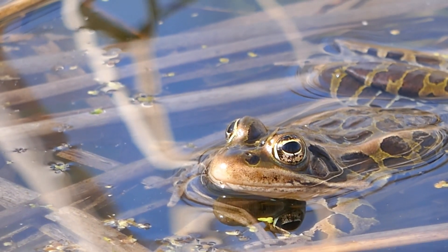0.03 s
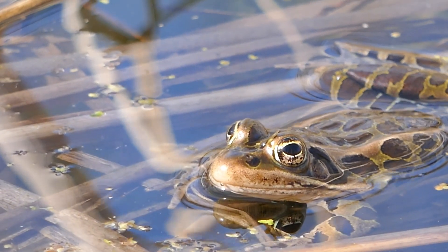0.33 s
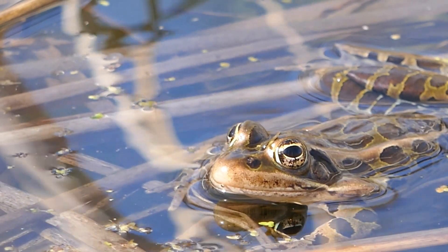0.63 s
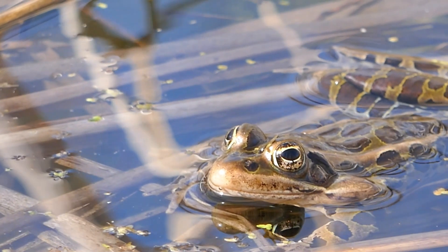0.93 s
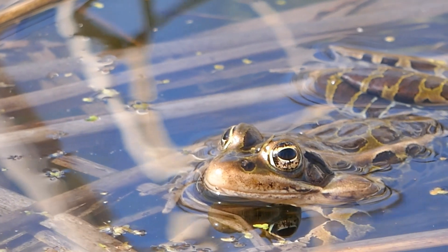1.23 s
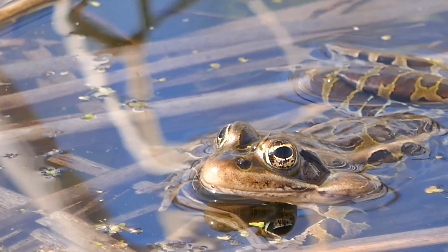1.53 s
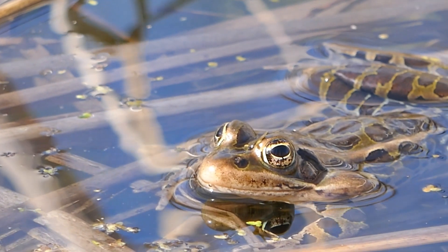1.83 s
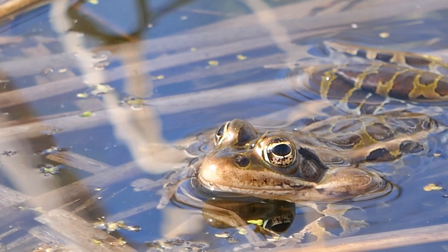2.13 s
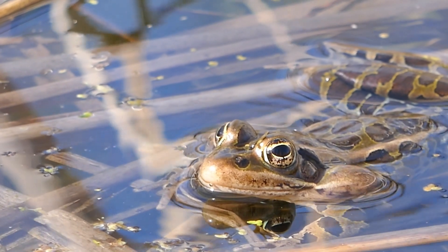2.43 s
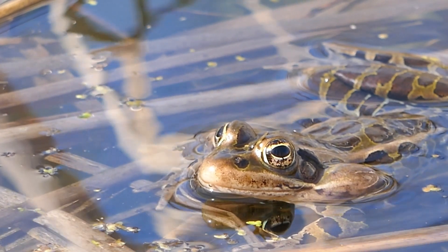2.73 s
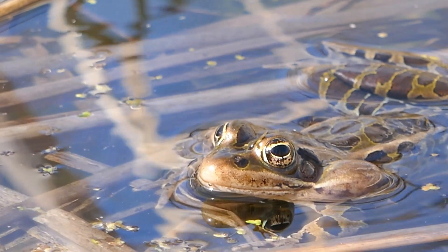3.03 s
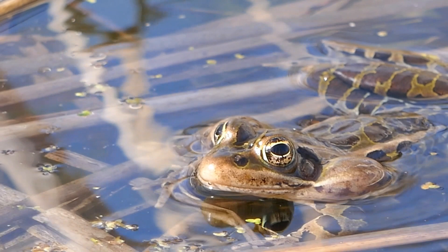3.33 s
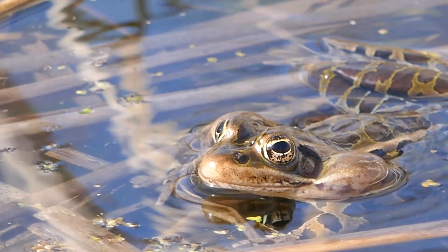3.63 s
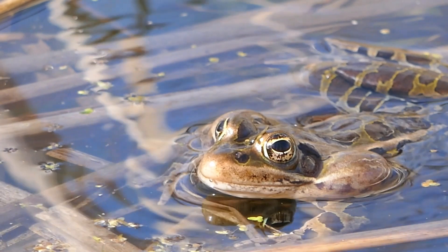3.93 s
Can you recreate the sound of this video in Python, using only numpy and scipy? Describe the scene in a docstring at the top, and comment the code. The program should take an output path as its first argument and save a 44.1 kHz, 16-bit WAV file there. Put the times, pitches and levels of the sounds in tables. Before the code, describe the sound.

One long, rattling snore from a nearby frog swells, then sags in pitch, with a light echo across the pond. Softer frogs tick at the start and toward the end, while distant traffic murmurs throughout.

```python
"""Distant traffic murmurs and a far frog ticks. Then a frog afloat in the pond gives one long snore:
single knocks of its larynx ring its body and swelling vocal sacs, growing louder and slower, then
sagging in pitch. The far frog stops early, as a soft plop sounds; a neighbour ticks along near the end.
Reeds scatter each knock, the banks echo it, and a camera's lens motor whines faintly now and then."""
import sys
import numpy as np
from scipy import signal
from scipy.fft import rfft, irfft
from scipy.io import wavfile
from scipy.ndimage import uniform_filter1d

SR = 44100
rng = np.random.default_rng(int(sys.argv[2]) if len(sys.argv) > 2 else 0)


def bounce(signal):
    """Save signal as a 16-bit WAV file at the path given by the first command-line argument."""
    frames = np.transpose(np.atleast_2d(signal))
    limited = np.clip(frames, -1, 1)
    pcm = np.round(limited * 32767).astype(np.int16)
    wavfile.write(sys.argv[1], SR, pcm)


N = 176400  # 4 seconds


def from_db(db):
    """Turn decibels into a number to multiply a sound by."""
    return 10 ** (np.asarray(db) / 20)


def look_up(table, where):
    """Find a place in a table's first column and read the others, gliding between rows."""
    first, *columns = np.array(table).T
    return [np.interp(where, first, column) for column in columns]


def set_level(sound, db):
    """Scale a sound to an average (rms) level in dB."""
    return sound / np.sqrt(np.mean(sound ** 2)) * from_db(db)


def wander(rate_hz):
    """A smooth random curve that strays about 1 either side of zero."""
    hold = int(SR / rate_hz)
    steps = np.repeat(rng.standard_normal(N // hold + 1), hold)
    return 1.1 * uniform_filter1d(uniform_filter1d(steps, hold), hold)[:N]


def stereo(shared, difference):
    """Add a difference for the left ear and take it away for the right."""
    return np.array([shared + difference, shared - difference])


def add(out, start_s, sound):
    """Mix a stereo sound in at a given time."""
    i = int(start_s * SR)
    out[:, i:i + sound.shape[1]] += sound[:, :max(N - i, 0)]


# The tone of the background. Each row: frequency in Hz, relative level in dB.
MURMUR_TONE = [(20, -78.5), (42, -87.5), (65, -81), (100, -69), (170, -67), (250, -71.5), (380, -72),
               (450, -67.5), (570, -68.5), (720, -75), (900, -75), (1300, -74), (1650, -85), (2300, -89.5),
               (2900, -105), (4400, -107), (5000, -105), (5600, -109.5), (8300, -110), (10500, -105.5),
               (15500, -111.5)]
# Its stereo width. Each row: frequency in Hz, the ears' difference against what they share in dB.
MURMUR_WIDTH = [(30, 0), (70, -20), (170, -12.5), (500, -11), (1300, -10.5), (2300, -6), (5000, -11.5),
                (11000, -6.5), (15000, -14)]

def traffic_and_pond(swell_db=3, flicker_db=0.8):
    """Distant traffic and pond murmur over a thin hiss: low bands swell together and flicker alone."""
    octaves = np.log2(np.fft.rfftfreq(N, 1 / SR) + 1)
    tone_db, = look_up([(np.log2(hz), db) for hz, db in MURMUR_TONE], octaves)
    width_db, = look_up([(np.log2(hz), db) for hz, db in MURMUR_WIDTH], octaves)
    shared, difference = rfft(rng.standard_normal((2, N)))
    spectrum = from_db(tone_db) * stereo(shared, from_db(width_db) * difference)
    swell = swell_db * wander(rate_hz=1.57)
    out = np.zeros((2, N))
    for octave in range(4, 16):
        band = irfft(spectrum * np.maximum(1 - abs(octaves - octave), 0), N)
        if 2 ** octave < 3000:  # the hiss in higher bands stays steady
            band *= from_db(swell + flicker_db * wander(rate_hz=14))
        out += band
    return set_level(out, db=-40.5)


# When the lens motor runs. Each row: start in seconds, end in seconds.
MOTOR_TIMES = [(.475, .668), (1.478, 1.655), (2.972, 3.145), (3.97, 4.0)]
# The tones of its whine. Each row: frequency in Hz, level in dB.
MOTOR_TONES = [(10562, -87), (10864, -85), (11337, -84), (11579, -72.5)]

def lens_motor():
    """A tiny motor whines in thin, high tones as it switches on and off."""
    t = np.arange(N) / SR
    running = sum(1. * ((t > start) & (t < end)) for start, end in MOTOR_TIMES)
    whine = sum(from_db(db) * np.sqrt(2) * np.sin(2 * np.pi * hz * t) for hz, db in MOTOR_TONES)
    return whine * uniform_filter1d(running, size=300)  # soften the switching


def plop(peak_s=1.655, fade_s=0.03, pitch_hz=690, width_hz=150):
    """A short, soft, hollow sound from across the water: a puff of narrow-band noise."""
    f, t = np.fft.rfftfreq(N, 1 / SR), np.arange(N) / SR
    band = np.exp(-((f - pitch_hz) / width_hz) ** 2)
    ring = irfft(rfft(rng.standard_normal(N)) * band, N)
    return set_level(ring, db=-39) * np.exp(-((t - peak_s) / fade_s) ** 2)


def echoes(sound, fade_s, db, spread, delay_s=0.00379):
    """Countless reflections, a little different in each ear, that die away by 60 dB in fade_s."""
    t = np.arange(SR // 2) / SR
    shared, difference = rng.standard_normal((2, len(t)))
    fade = np.exp(-np.log(1000) * t / fade_s) * (t > delay_s)
    tail = stereo(shared, spread * difference) * fade
    tail *= from_db(db) / np.sqrt(np.sum(tail ** 2) / 2)
    return signal.fftconvolve(sound, tail, axes=1)[:, :N]


def reeds_and_banks(sound, dull_hz=4500):
    """Reeds close by scatter a sound briefly; the banks return a longer echo with little treble."""
    reeds = echoes(sound, fade_s=0.024, db=-13, spread=0.12)
    dulled = signal.sosfilt(signal.butter(2, dull_hz, fs=SR, output="sos"), sound)
    banks = echoes(dulled, fade_s=0.55, db=-19.5, spread=0.28)
    return reeds + banks


def knock(resonances, db, notch_hz=None, edge=(), size=4096):
    """One push of the larynx sets off resonances: the pitches at which a frog naturally rings."""
    f = np.fft.rfftfreq(size, 1 / SR)

    def peak(hz, width, level_db, steepness=1.9):
        """The power of one resonance, falling away on both sides of its pitch."""
        return from_db(level_db) ** 2 / (1 + (2 * (f - hz) / width) ** 2) ** steepness

    power = sum(peak(hz, width, stereo(level, pan / 2)[:, None]) for hz, width, level, pan in resonances)
    top_hz = 1.073 * max(hz for hz, *_ in resonances)
    power /= 1 + (f / top_hz) ** 40  # the push is too soft to ring much higher
    power += sum(peak(*row) for row in edge)
    snap = from_db(-70) ** 2 / (1 + (f / 9000) ** 2)  # a faint, broad click
    gain = np.sqrt(power + snap)
    gain /= np.sqrt(1 + (449 / (f + 40)) ** 12)  # a small body gives off little bass
    if notch_hz is not None:  # a dip 16.5 dB deep and 475 Hz wide
        gain *= from_db(-16.5 / (1 + (2 * (f - notch_hz) / 475) ** 2))
    # Turn this tone shape into a sound that starts sharply and rings out (minimum phase).
    cepstrum = irfft(np.log(gain))
    cepstrum[:, 1:size // 2] *= 2
    cepstrum[:, size // 2 + 1:] = 0
    ring = irfft(np.exp(rfft(cepstrum)))
    energy = np.sum(ring.mean(axis=0) ** 2)
    return ring * from_db(db) / np.sqrt(energy / (0.005 * SR))  # as much energy as 5 ms at this level


# The far frog's ticks, then its two last knocks. Each row: start in seconds, level in dB before any boost.
FAR_FROG_TICKS = [(0.153, -45.5), (0.235, -55), (0.35, -52), (0.4248, -42.5), (0.4925, -43.5), (0.558, -44),
                  (0.6255, -42), (0.691, -42), (0.7599, -41.5), (0.8278, -42), (0.897, -43), (0.966, -42),
                  (1.0354, -41.5), (1.1735, -40), (1.2436, -41.5), (1.3138, -38.5), (1.3857, -42),
                  (1.458, -41), (1.5273, -43)]
FAR_LAST_KNOCKS = [(1.596, -44), (1.657, -44)]
# How each kind rings. Each row: pitch in Hz, width in Hz, relative level in dB, left minus right in dB.
FAR_TICK_RING = [(1320, 240, 13, -1.5), (590, 400, -22, 3), (2330, 870, -17, 0), (3880, 560, -25, 0)]
FAR_LAST_RING = [(1150, 440, -7, -1), (650, 280, 1, -1), (3340, 330, -15, 0)]

def far_frog(tick_boost_db=2):
    """A far frog ticks at the start and ends on two ringing knocks."""
    out = np.zeros((2, N))
    for start, db in FAR_FROG_TICKS:
        add(out, start, knock(FAR_TICK_RING, db + tick_boost_db))
    for start, db in FAR_LAST_KNOCKS:
        add(out, start, knock(FAR_LAST_RING, db))
    return out


# The neighbour's ticks. Each row: start in seconds, level in dB before trim_db is added.
NEIGHBOUR_CALL = [(2.9646, -39), (3.0291, -33.5), (3.0975, -34), (3.165, -32.5), (3.2327, -34.5),
                  (3.3038, -34), (3.374, -31.5), (3.4475, -32.5), (3.52, -26.5), (3.596, -25.5),
                  (3.6707, -26.5), (3.7466, -30), (3.825, -28), (3.903, -28), (3.9803, -26)]
# How it rings. Each row: full pitch in Hz, width in Hz, relative level in dB, left minus right in dB.
NEIGHBOUR_RING = [(1190, 280, 1, -0.9), (890, 260, 1.5, -0.9), (2050, 900, -20.5, 0.14)]
# How its pitch bends. Each row: time in seconds, share of full pitch.
NEIGHBOUR_BEND = [(3.45, 0.85), (3.52, 1), (3.6, 1.0), (3.67, 0.92), (3.747, 0.86), (3.903, 0.85),
                  (3.98, 0.91)]

def neighbour_frog(trim_db=-1):
    """Another frog joins in late, its ticks briefly rising in pitch."""
    out = np.zeros((2, N))
    for start, db in NEIGHBOUR_CALL:
        bend, = look_up(NEIGHBOUR_BEND, start)
        resonances = [(hz * bend, width, level, pan) for hz, width, level, pan in NEIGHBOUR_RING]
        add(out, start, knock(resonances, db + trim_db))
    return out


# The knocks of the near frog's snore. Each row: start in seconds, level in dB.
SNORE_KNOCKS = [(0.952, -42), (1.0042, -39), (1.0558, -37), (1.1068, -35.5), (1.16, -37.5), (1.2126, -35),
                (1.2653, -38.5), (1.3176, -35.5), (1.37, -41), (1.4245, -34.5), (1.4797, -34.5),
                (1.5338, -35), (1.5879, -31), (1.6434, -31.5), (1.6981, -33.5), (1.7535, -31),
                (1.8088, -32), (1.865, -32), (1.9215, -29), (1.982, -28.5), (2.0425, -28), (2.1007, -26.5),
                (2.1616, -25.5), (2.2202, -26), (2.2798, -24), (2.343, -23), (2.4067, -22), (2.4733, -22),
                (2.537, -21), (2.6004, -21), (2.6648, -20.5), (2.7305, -19), (2.7967, -18.5),
                (2.8631, -17.5), (2.929, -17.5), (2.9965, -17), (3.0647, -16.5), (3.1331, -16),
                (3.2029, -15.5), (3.2726, -16), (3.3405, -15.5), (3.4096, -14.5), (3.4796, -14),
                (3.55, -14), (3.6214, -13.5), (3.6943, -14.3), (3.7637, -13.5), (3.8317, -14),
                (3.8914, -15.5), (3.9164, -20.5)]
# Its body's low ring.
# Each row: pitch in Hz, starting width in Hz, relative level in dB, left minus right in dB.
BODY_RING = [(474.4, 118, 0, 0), (605, 550, -7, -3.5), (1004, 616, -5, -2.5)]
# Its vocal sacs' ring.
# Each row: multiple of the sac pitch, starting width in Hz, relative level in dB, left minus right in dB.
SAC_RING = [(1.0, 220, 2, -3.5), (1.138, 197, -4.5, -5), (1.42, 700, -20.5, 3.5)]
# The sacs through the call. Each row: time in seconds, sac pitch in Hz, dB added to the body's ring.
SAC_CHANGES = [(1.0, 1143, -0.5), (2.0, 1108, -2), (2.7, 1184, -3.5), (3.3, 1184, -2.5), (3.69, 1173, -2),
               (3.765, 1128, 0), (3.832, 1070, 0), (3.892, 1030, 1.5), (3.918, 980, 17)]
# Two overtones of the throat.
# Each row: time in seconds, the lower one's pitch in Hz and relative level in dB, the same for the upper.
THROAT_OVERTONES = [(1.1, 2450, -19, 3040, -28), (1.9, 2280, -20.5, 3080, -33),
                    (2.28, 2200, -21.5, 2700, -19.5), (2.343, 2330, -25.5, 3970, -37.5),
                    (2.9, 2282, -22.5, 3840, -32), (3.3, 2440, -22, 3730, -30.5),
                    (3.55, 2840, -33, 3710, -31.5), (3.695, 2500, -26, 3720, -32.5),
                    (3.765, 2240, -18, 3540, -27), (3.832, 2300, -15.5, 3480, -22.5),
                    (3.892, 2300, -19, 3320, -22), (3.918, 2280, -22, 3450, -14)]
# A dip in the tone that sinks as the sacs swell. Each row: time in seconds, frequency in Hz.
SINKING_NOTCH = [(1.9, 3650), (2.28, 3200), (2.73, 2920), (3.2, 2590), (3.5, 2230), (3.62, 1930),
                 (3.765, 1570), (3.832, 1520), (3.892, 1220)]
# Faint high rings that give a knock its edge. Each row: pitch in Hz, width in Hz, relative level in dB.
BRIGHT_EDGE = [(4400, 750, -51.5), (9600, 620, -53), (13300, 1100, -62)]

def near_frog(sac_jitter=0.0083, filling_s=(3.67, 3.88), full_edge_db=-12, throat_pan_db=2.5):
    """Each knock of the larynx rings body, sacs and throat as they are tuned at that moment."""
    out = np.zeros((2, N))
    for start, db in SNORE_KNOCKS:
        sac_hz, body_db = look_up(SAC_CHANGES, start)
        sac_hz *= 1 + sac_jitter * rng.standard_normal()
        lower_hz, lower_db, upper_hz, upper_db = look_up(THROAT_OVERTONES, start)
        notch_hz, = look_up(SINKING_NOTCH, start)
        # As the sacs fill, the resonances narrow and ring longer, and the knocks lose their edge.
        fullness = np.interp(start, filling_s, [0, 1])
        narrowing, throat_narrowing = 0.84 ** fullness, 0.57 ** fullness
        body = [(hz, width * narrowing, level + body_db, pan) for hz, width, level, pan in BODY_RING]
        sacs = [(ratio * sac_hz, width * narrowing, level, pan) for ratio, width, level, pan in SAC_RING]
        throat = [(lower_hz, 490 * throat_narrowing, lower_db, throat_pan_db),
                  (upper_hz, 210 * throat_narrowing, upper_db, throat_pan_db)]
        edge = [(hz, width, level + full_edge_db * fullness) for hz, width, level in BRIGHT_EDGE]
        add(out, start, knock(body + sacs + throat, db, notch_hz, edge))
    return out


def scene():
    """Three frogs and their echoes over the background."""
    frogs = far_frog() + neighbour_frog() + near_frog()
    reflections = reeds_and_banks(frogs)
    background = traffic_and_pond() + lens_motor() + plop()
    return background + reflections + frogs


def record(dry, top_hz=15900):
    """The camera cuts off the highest treble."""
    return signal.sosfilt(signal.ellip(10, .1, 70, top_hz, fs=SR, output="sos"), dry)


dry = scene()
out = record(dry)
bounce(out)
```